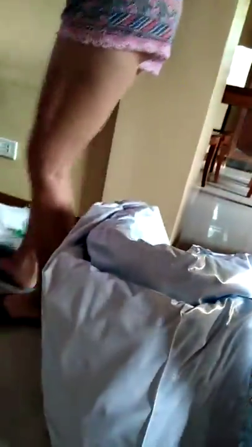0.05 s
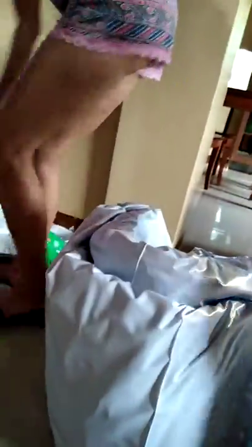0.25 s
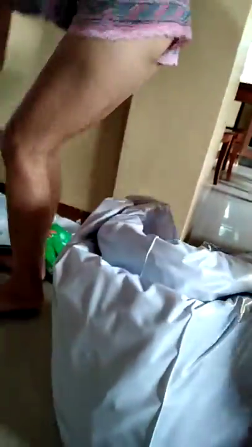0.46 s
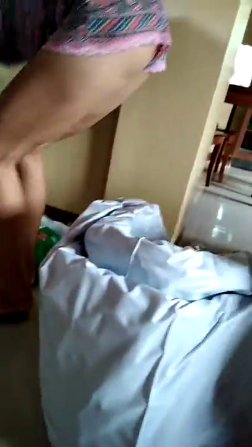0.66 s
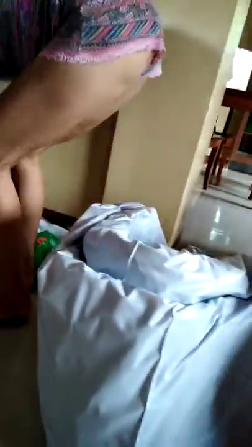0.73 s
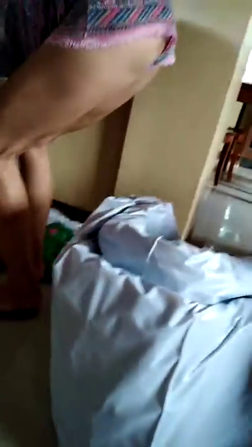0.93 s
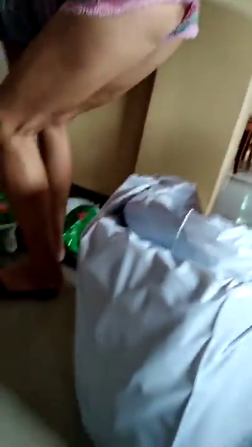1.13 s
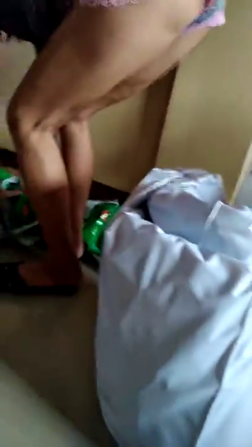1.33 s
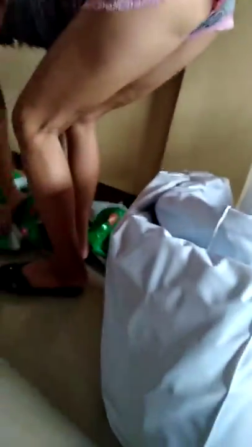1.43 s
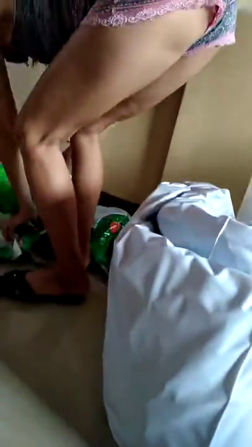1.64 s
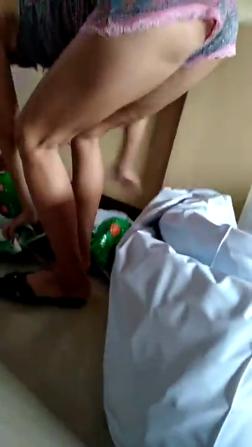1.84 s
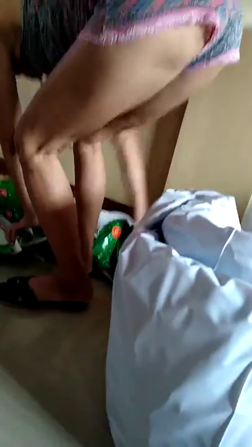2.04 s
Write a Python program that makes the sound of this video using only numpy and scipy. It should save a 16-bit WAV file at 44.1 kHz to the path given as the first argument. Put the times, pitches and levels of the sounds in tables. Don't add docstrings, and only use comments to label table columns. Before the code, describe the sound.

Handled plastic packaging: brief bright crinkling, one hard snap with short room echo, a quiet gap, then a strong swarm of crackles, pops and dull knocks, thinning at the end; stereo phone nearby indoors.

```python
import sys
import numpy as np
from scipy import signal
from scipy.fft import rfft, irfft
from scipy.io import wavfile
from scipy.ndimage import uniform_filter1d

SR = 44100
rng = np.random.default_rng(int(sys.argv[2]) if len(sys.argv) > 2 else 0)


def gain_from_decibels(decibels):
    exponent = np.asarray(decibels, float) / 20
    return 10 ** exponent


def generate_wav(sig):
    pcm = np.round(np.clip(np.atleast_2d(sig).T, -1, 1) * 32767).astype(np.int16)
    wavfile.write(sys.argv[1], SR, pcm)


N = 91728

# pitch_hz [Hz], level_db [dB]
THIN_SPECTRUM = [(1470, -22), (2500, -7), (3360, -11), (4370, -8), (7000, 0), (8670, 3), (13700, -18),
                 (14500, -27.5)]
POP_ROOM_DB = -2


def evened(x):
    return x / np.sqrt(np.mean(x ** 2) + 1e-20)


def read(points, hz):
    f, value = np.transpose(points)
    return np.interp(np.log(hz + 1), np.log(f + 1), value)


def colour(x, points):
    hz = np.fft.rfftfreq(4096, 1 / SR)
    log_gain = np.log(gain_from_decibels(np.maximum(read(points, hz), -90)))
    full = np.r_[log_gain, log_gain[-2:0:-1]]
    taps = np.fft.ifft(np.exp(signal.hilbert(full).conj())).real[:2048]
    taps = taps / np.linalg.norm(taps)
    return signal.oaconvolve(x, taps[None], axes=-1)[..., :x.shape[-1]]


def clicks(times_s, levels_db, decay_s, rise_s):
    out = np.zeros((2, N))
    t = np.arange(3000) / SR
    envelope = np.minimum(t / rise_s, 1) * np.exp(-t / decay_s)
    noise = rng.standard_normal((len(times_s), 2, 3000))
    for start_s, level_db, z in zip(times_s, levels_db, noise):
        part = out[:, round(start_s * SR):][:, :3000]
        part += (gain_from_decibels(level_db) * z * envelope)[:, :part.shape[1]]
    return out


def rings(rows, t60_s, rise_cycles=1.0):
    out = np.zeros(N)
    t = np.arange(SR // 3) / SR
    for start_s, level_db, hz in rows:
        part = out[round(start_s * SR):][:len(t)]
        envelope = gain_from_decibels(level_db - 60 * t / t60_s) * np.minimum(t * hz / rise_cycles, 1)
        part += (envelope * np.sin(2 * np.pi * hz * t))[:len(part)]
    return np.array([out, out])


def panel_rings(rows, cycles, rise_cycles=1.0):
    return sum(rings([row], cycles / row[2], rise_cycles) for row in rows)


def room(x, wet_db):
    # pitch_hz [Hz], t60_s [s]
    reverb_times = [(200, 0.4), (1000, 0.32), (3000, 0.42), (8000, 0.33), (14000, 0.3)]
    taps = np.zeros((2, SR // 2))
    at = np.arange(200, SR // 2 - 20, 20) + rng.integers(0, 20, (2, (SR // 2 - 201) // 20))
    np.put_along_axis(taps, at, rng.choice([-1., 1.], at.shape), 1)
    hz, t, z = signal.stft(taps, SR, nperseg=256)
    decay = gain_from_decibels(-60 * t / read(reverb_times, hz)[:, None])
    tail = signal.istft(z * decay, SR, nperseg=256)[1]
    tail = tail / np.linalg.norm(tail[0])
    return x + gain_from_decibels(wet_db) * signal.fftconvolve(x, tail, axes=1)[:, :N]


def swarm(per_s, spread_db, points):
    clump_db, clump_s = 1, 0.022
    clump = evened(uniform_filter1d(rng.standard_normal(N), round(clump_s * SR)))
    size_db = spread_db * np.minimum(rng.exponential(1, N), 4) + clump_db * clump
    size = gain_from_decibels(size_db) * (rng.random(N) < per_s / SR)
    buckles = colour(size * rng.standard_normal((2, N)), points)
    return evened(room(buckles, -0.5))


def rustle():
    # start_s [s], thin_db [dB], thick_share_db [dB re thin]
    effort = [(0, -23.5, -13.5), (0.036, -27.5, -18.5), (.2, -41, -6), (0.391, -40, -4), (.435, -35, -11),
              (0.499, -47, -5.5), (0.619, -56.5, -15.5), (0.814, -72.5, -15), (0.824, -38.5, -6),
              (.9, -35, -4), (1.07, -26, -13.5), (1.28, -28, -6.5), (1.386, -26.5, -5), (1.5, -36, -8.5),
              (1.632, -30, -3), (1.78, -41.5, -1.5), (1.96, -46, -4.5), (2.08, -48.5, -1)]
    # pitch_hz [Hz], level_db [dB]
    thick_spectrum = [(53, -49), (90, -21.5), (253, 1), (500, -10.5), (644, 2), (974, -5.5), (1750, 0),
                      (3360, -14), (4000, -7.5), (5200, -43.5), (8800, -120)]
    dulling_hz, dulling_db_per_db, bright_db = 9500, .35, -27.5
    s, thin_db, share_db = np.transpose(effort)
    t = np.arange(N) / SR
    effort_db = np.interp(t, s, thin_db)
    thin = gain_from_decibels(effort_db + 2.0) * swarm(9000, 1.9, [(1200, -40)] + THIN_SPECTRUM)
    treble = signal.sosfilt(signal.butter(1, dulling_hz, "high", fs=SR, output="sos"), thin)
    loss_db = dulling_db_per_db * np.clip(effort_db - bright_db, -16, 0)
    thin = thin - treble * (1 - gain_from_decibels(loss_db))
    thick = swarm(3000, 2.2, [(40, -46.5)] + thick_spectrum + [(7000, -23.0)])
    return thin + gain_from_decibels(np.interp(t, s, thin_db + share_db) + 2.0) * thick


def snap():
    # pitch_hz [Hz], level_db [dB]
    crack_spectrum = [(59, -60.5), (100, -35), (242, -6), (504, -7), (2590, -4.5), (3780, -14.5),
                      (7890, -2.5), (10900, -17), (11500, -25.5), (14200, -32.5)]
    # pitch_hz [Hz], level_db [dB], t60_s [s]
    body_modes = [(602, -18.5, .03), (778, -14.5, 0.034), (1510, -14, .04), (1806, -23, 0.028),
                  (1993, -13, 0.047), (5550, -24.5, 0.089), (7060, -25, 0.032), (7680, -26.5, 0.046),
                  (8700, -18, 0.061), (7900, -20, .06)]
    start_s, peak_db, body_db = .2088, -15.5, 4
    crack = colour(clicks([start_s], [peak_db + 10.5], 0.008, 0.00077), crack_spectrum)
    t = np.maximum(np.arange(N) / SR - start_s, 0)
    body = np.zeros(N)
    for hz, level_db, t60_s in body_modes:
        body += gain_from_decibels(level_db + body_db - 60 * t / t60_s) * np.sin(2 * np.pi * hz * t)
    return room(crack, 0.5) + body * (1 - np.exp(-t / 0.0024))


def pops():
    # start_s [s], peak_db [dB], bright_share_db [dB]
    pop_events = [(0.004, -26.5, 5), (0.14, -29.5, -9), (0.149, -23.5, -8), (0.166, -31.5, 6.5),
                  (0.447, -27.5, -2.5), (0.826, -43.5, 17.5), (0.87, -43, -7), (0.877, -36.5, 9),
                  (0.919, -24, 1), (0.926, -37, 5), (1.047, -22.5, -2), (1.082, -23.5, 5),
                  (1.252, -21.5, 0), (1.368, -22.5, -20), (1.445, -30, 9.5), (1.506, -28, -24.5),
                  (1.55, -24, -3), (1.617, -26.5, 3.5), (1.648, -24.5, 2.5), (1.717, -36.5, 16.5),
                  (1.809, -28.5, 3.5), (1.851, -38, -22), (1.984, -36, 1), (1.989, -32, 0),
                  (2.004, -29.5, 0.5)]
    decay_s, rise_s = 0.0075, 0.0011
    dull_spectrum = [(150, -19.0), (600, -3.0), (1800, 2.0), (3500, -11.5), (8000, -24.5)]
    s, db, bright_db = np.transpose(pop_events)
    dull = colour(clicks(s, db - 3.5, decay_s, rise_s), dull_spectrum)
    bright = clicks(s, db + bright_db - 1.5, decay_s, rise_s)
    return room(dull + colour(bright, [(1200, -30.5)] + THIN_SPECTRUM), POP_ROOM_DB)


def cracks():
    # start_s [s], peak_db [dB], pitch_hz [Hz]
    thin_cracks = [(0.8265, -31, 8900), (0.876, -34, 8300), (0.909, -28, 7950), (0.927, -17, 7300),
                   (0.9683, -24, 8800), (1.0084, -27, 8550), (1.049, -14, 7400), (1.064, -21, 8980),
                   (1.0852, -23, 9150), (1.1134, -30, 8900), (1.153, -14, 8600), (1.1776, -13, 8100),
                   (1.2081, -9.5, 8830), (1.2321, -12, 7400), (1.252, -19, 7940), (1.2634, -16, 9000),
                   (1.2784, -34, 8700), (1.3244, -16, 9240), (1.3337, -17, 9170), (1.3667, -13, 8310),
                   (1.378, -15, 8850), (1.3953, -19, 8900), (1.4437, -31, 8700), (1.5503, -17.5, 8160),
                   (1.619, -13, 7750), (1.6514, -17, 8570), (1.718, -19.5, 8300), (1.8093, -19, 7480),
                   (2.005, -20, 7900)]
    # start_s [s], peak_db [dB], pitch_hz [Hz]
    thick_knocks = [(0.821, -33, 1430), (0.87, -27.5, 698), (0.918, -20, 1620), (0.965, -37, 786),
                    (1.045, -16.5, 1730), (1.11, -24, 2900), (1.157, -15.5, 2880), (1.177, -20.5, 1340),
                    (1.273, -24, 1490), (1.332, -23, 783), (1.443, -36, 1710), (1.506, -23.5, 1410),
                    (1.55, -24, 740), (1.616, -24, 1850), (1.809, -25, 1670), (1.852, -27.5, 805),
                    (1.983, -30, 1900)]
    thin = gain_from_decibels(-2.5) * panel_rings(thin_cracks, 92, 8.2)
    thick = gain_from_decibels(-2) * panel_rings(thick_knocks, 20)
    return room(thin + thick, POP_ROOM_DB)


def thumps():
    # start_s [s], peak_db [dB], pitch_hz [Hz]
    fold_drops = [(0.011, -56, 250), (0.151, -42, 324), (0.224, -20.5, 254), (0.433, -29.5, 243),
                  (0.469, -38, 240), (0.559, -48.5, 176.8), (0.599, -57, 207), (.635, -62, 282),
                  (0.682, -53, 136), (.69, -63.5, 250), (0.867, -31, 234), (1.147, -36.5, 329),
                  (1.182, -44, 250), (1.226, -36, 258), (1.314, -31, 272), (1.358, -33, 330),
                  (1.649, -33, 334), (1.791, -39.5, 241), (1.919, -40.5, 314), (1.358, -26, 173.6),
                  (1.4, -33.5, 157)]
    return rings(fold_drops, 0.13)


def groan():
    # start_s [s], pitch_hz [Hz], level_db [dB]
    glide = [
        (1.462, 198, -35),
        (1.482, 195.5, -42),
        (1.54, 159.5, -40),
        (1.575, 169, -40.5),
        (1.61, 156.5, -53),
        (1.64, 153.5, -41.5),
        (1.685, 157.7, -53),
    ]
    s, hz, db = np.transpose(glide)
    t = np.arange(N) / SR
    phase = 2 * np.pi * np.cumsum(np.interp(t, s, hz)) / SR
    edge = np.clip(np.minimum(t - s[0], s[-1] - t) / 0.0058, 0, 1)
    return gain_from_decibels(np.interp(t, s, db) + 7.0) * edge * (np.sin(phase) + 0.24 * np.sin(2 * phase))


def ticks():
    # start_s [s], peak_db [dB], pitch_hz [Hz]
    tick_events = [(.6295, -42, 9730), (.6295, -47.5, 7000), (.6305, -35.5, 7510), (.6295, -41, 8200),
                   (.6295, -31, 10460), (.629, -42, 11400), (.696, -59, 3160), (.7195, -60, 1154),
                   (.72, -52, 1700), (.7195, -60, 2620), (.7195, -59, 3150)]
    return panel_rings(tick_events, 104, 3)


def bumps():
    # start_s [s], peak_db [dB], pitch_hz [Hz]
    hand_bumps = [(0.338, -50.5, 118), (0.582, -46, 74.5), (0.645, -41, 75.7), (0.685, -53, 95),
                  (0.729, -51, 83.4), (1.353, -64, 119), (1.569, -46, 120), (1.19, -60, 61.7),
                  (1.72, -43, 120), (1.76, -54, 85), (1.897, -54, 109), (1.945, -54, 60),
                  (1.989, -53, 97.5)]
    return rings(hand_bumps, 0.17)


def hum():
    # pitch_hz [Hz], level_db [dB]
    hum_spectrum = [(15, -25), (25, -7), (91, 2.5), (244, -36.5), (1680, -50.5), (4990, -49.5),
                    (10500, -39.5), (14000, -50.5)]
    return gain_from_decibels(-77.5) * evened(colour(rng.standard_normal((2, N)), hum_spectrum))


def ports(x):
    # pitch_hz [Hz], left_minus_right_db [dB]
    balance = [(60, 0), (250, 3.5), (1000, 4), (2200, 5), (4200, 0.5), (5800, 0), (6900, -4), (7800, 6.5),
               (13000, 12.5)]
    # pitch_hz [Hz], likeness [0-1]
    likeness = [(60, 0.93), (250, 0.99), (600, 0.64), (1500, 0.041), (12000, 0.029)]
    z, hz = rfft(x), np.fft.rfftfreq(N, 1 / SR)
    same = np.clip(read(likeness, hz), 0, 1)
    pair = np.array([z[0], same * z[0] + np.sqrt(1 - same ** 2) * z[1]])
    tilt_db = read(balance, hz) * np.array([[.5], [-.5]])
    return irfft(pair * gain_from_decibels(tilt_db), N)


def suppress(x):
    # pitch_hz [Hz], level_db [dB per bin]
    noise_floor = [(700, -90), (1400, -95), (2200, -108), (3500, -106), (5700, -85), (6400, -83),
                   (7200, -91), (8000, -84), (8500, -76), (9050, -75), (9350, -92), (10500, -104),
                   (11500, -98), (12500, -86), (13500, -100)]
    knee_db, depth_db = 2.5, -17
    z = signal.stft(x, nperseg=1024, noverlap=768)[2]
    power = (abs(z) ** 2).mean(0)
    power = uniform_filter1d(uniform_filter1d(power, size=3, axis=0), size=7, axis=1)
    floor_db = read(noise_floor, np.fft.rfftfreq(1024, 1 / SR))[:, None]
    over_db = 10 * np.log10(abs(power) + 1e-20) - floor_db
    shut = .5 - .5 * np.tanh(over_db / knee_db)
    return signal.istft(z * gain_from_decibels(depth_db * shut), nperseg=1024, noverlap=768)[1][:, :N]


def scene():
    low = room(thumps() + ticks(), -11) + bumps() + groan()
    wide = rustle() + pops() + snap() + hum() + cracks()
    return ports(wide) + low * gain_from_decibels([[1.5], [-1.5]])


def roll_off(x):
    return signal.sosfilt(signal.butter(12, 15280, fs=SR, output="sos"), x)


def record(dry):
    low_pass = signal.firwin(511, 14250, window=("kaiser", 8), fs=SR)
    cut = signal.oaconvolve(suppress(dry), low_pass[None], "same")
    cut = signal.sosfilt(signal.butter(2, 47, "high", fs=SR, output="sos"), cut)
    return roll_off(np.clip(cut, -1, 1))


dry = scene()
out = record(dry)
generate_wav(out)
```